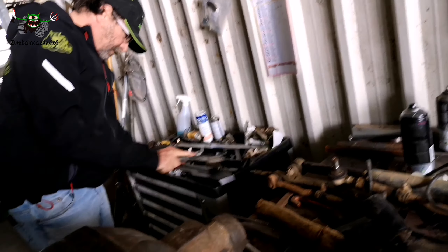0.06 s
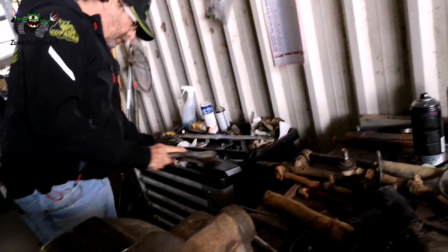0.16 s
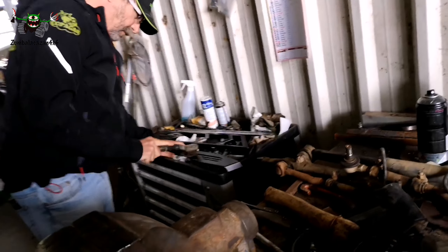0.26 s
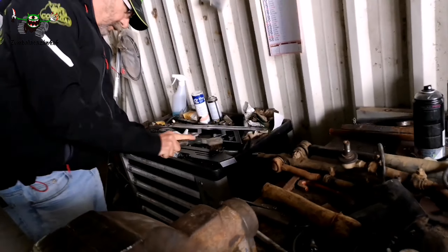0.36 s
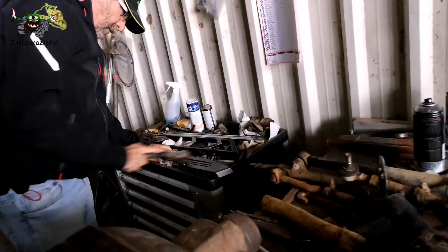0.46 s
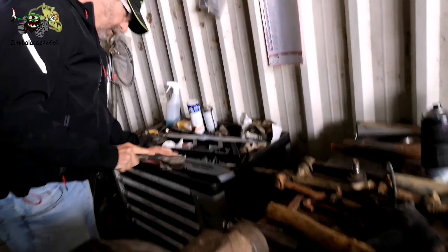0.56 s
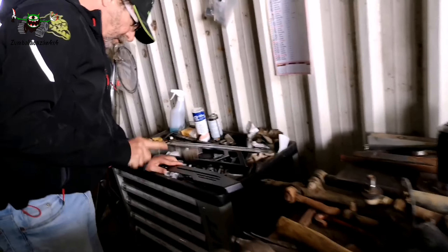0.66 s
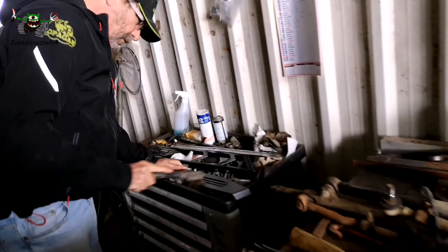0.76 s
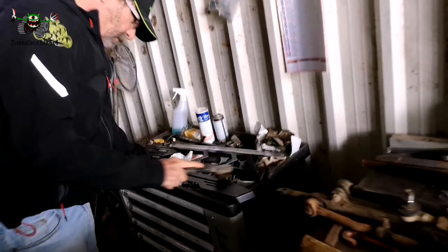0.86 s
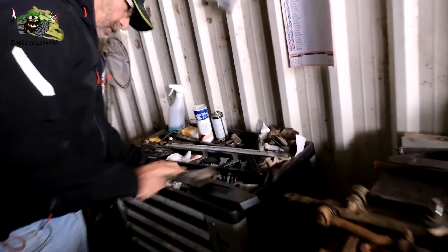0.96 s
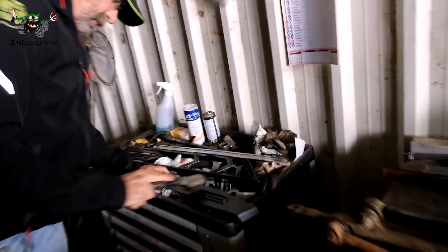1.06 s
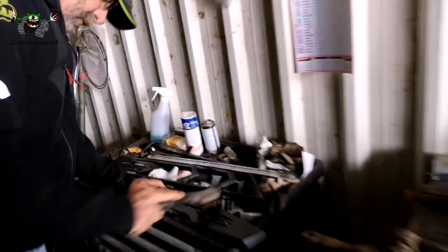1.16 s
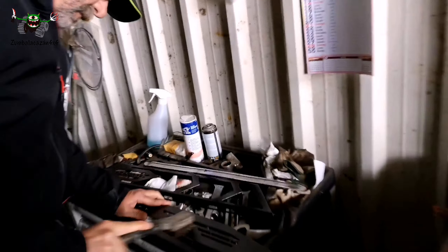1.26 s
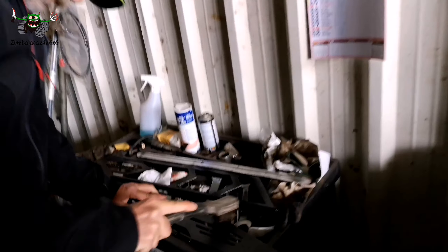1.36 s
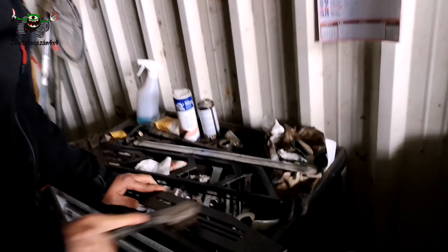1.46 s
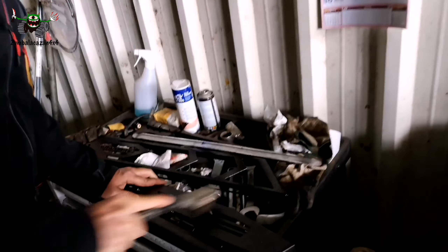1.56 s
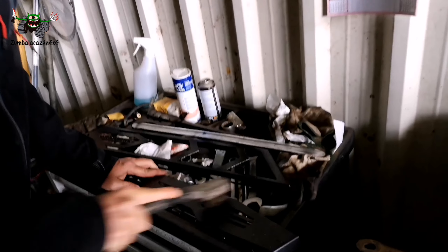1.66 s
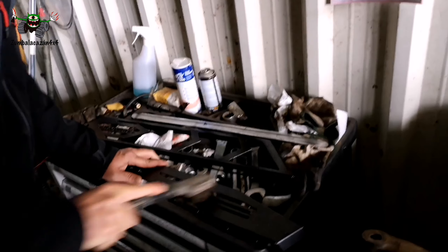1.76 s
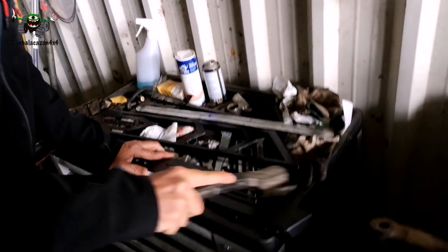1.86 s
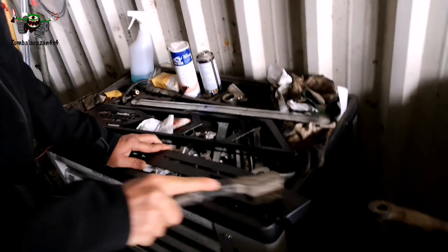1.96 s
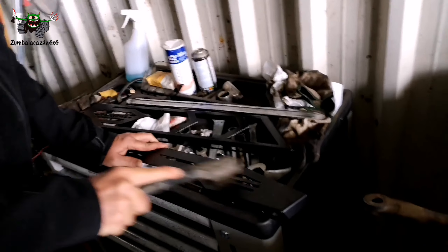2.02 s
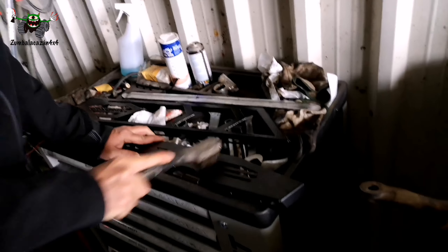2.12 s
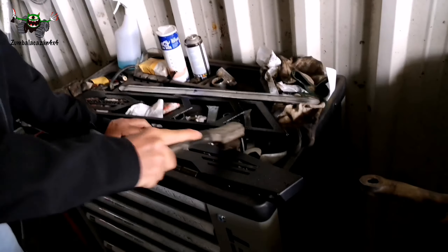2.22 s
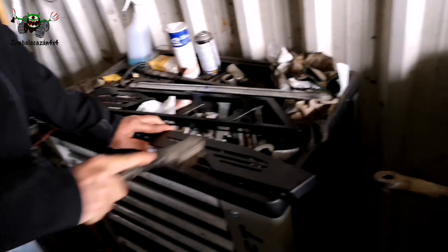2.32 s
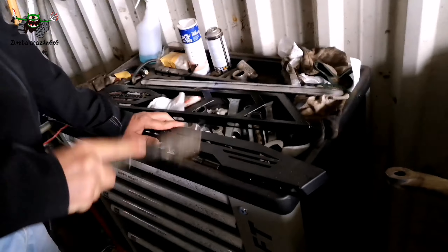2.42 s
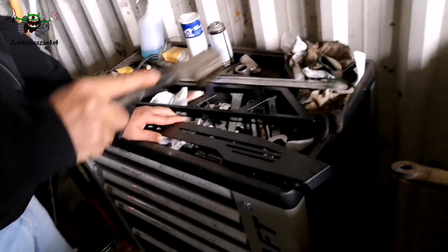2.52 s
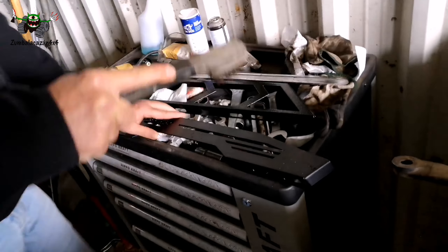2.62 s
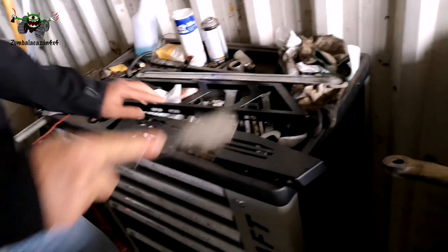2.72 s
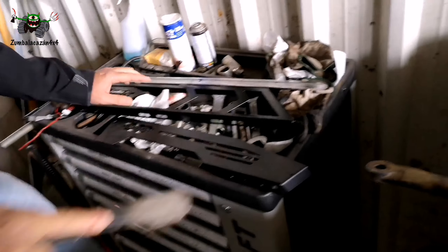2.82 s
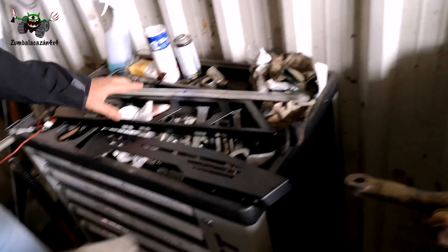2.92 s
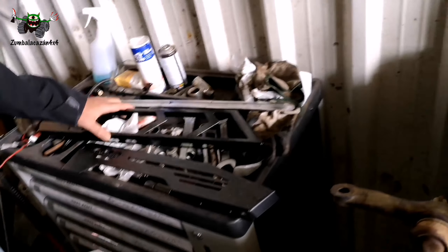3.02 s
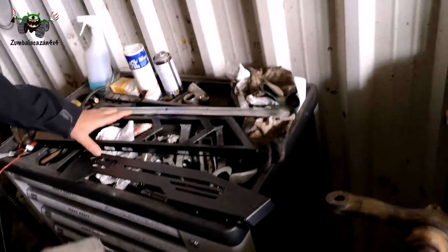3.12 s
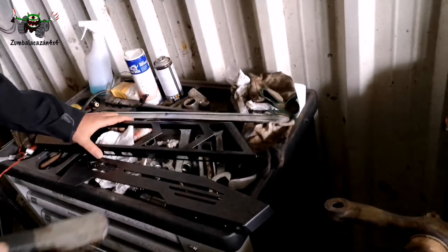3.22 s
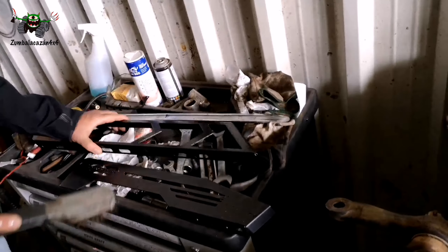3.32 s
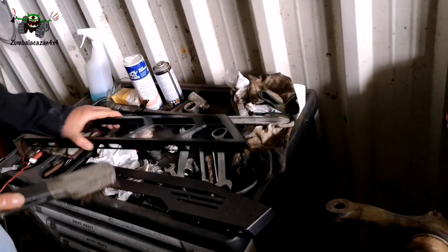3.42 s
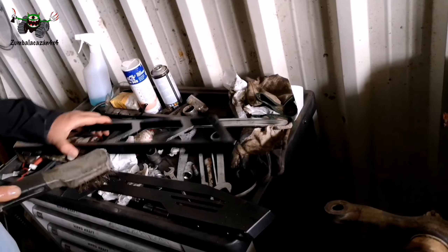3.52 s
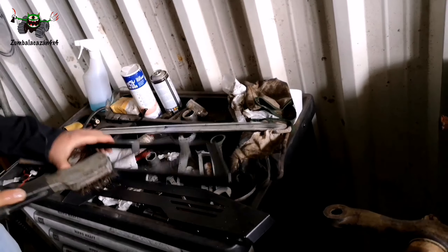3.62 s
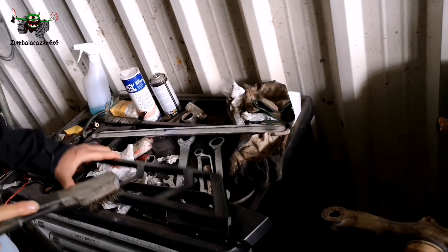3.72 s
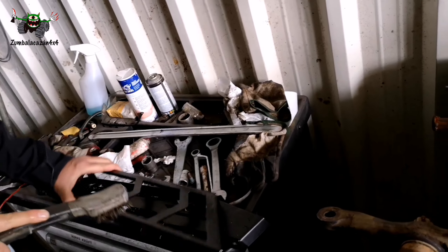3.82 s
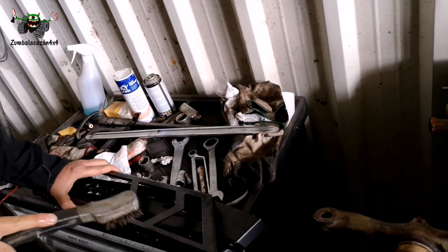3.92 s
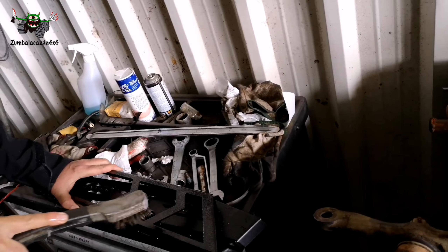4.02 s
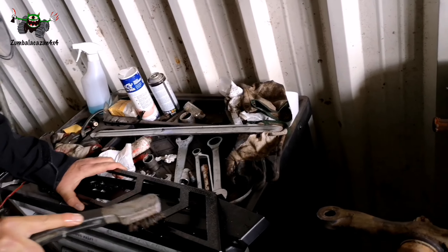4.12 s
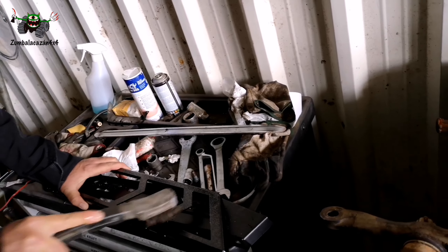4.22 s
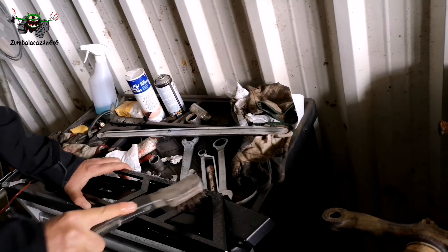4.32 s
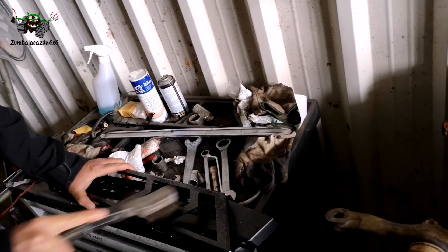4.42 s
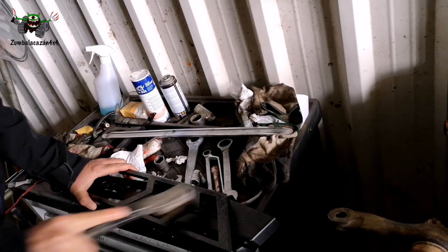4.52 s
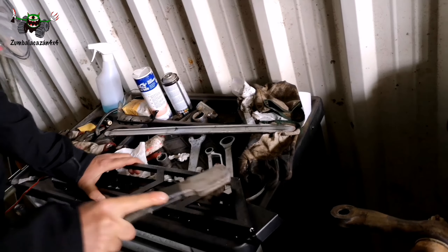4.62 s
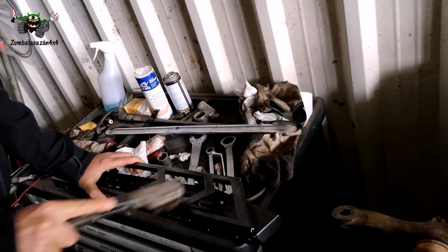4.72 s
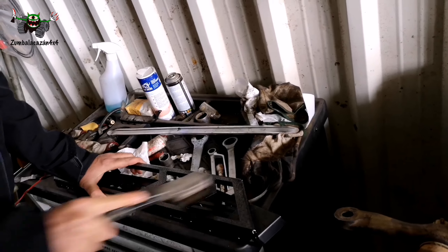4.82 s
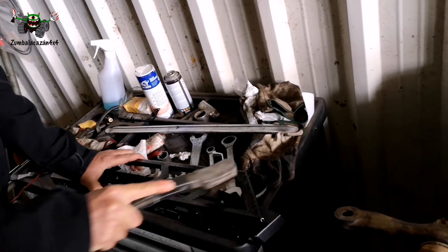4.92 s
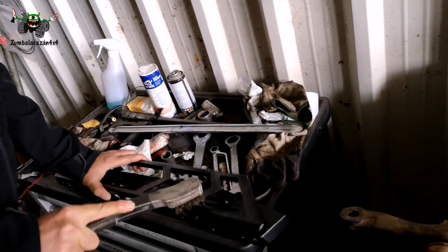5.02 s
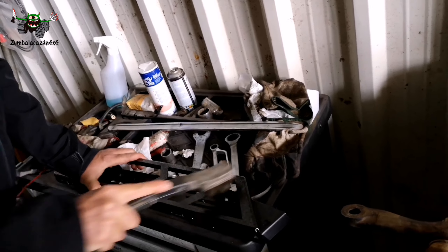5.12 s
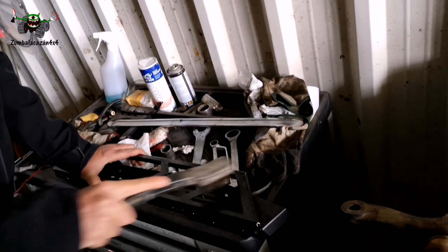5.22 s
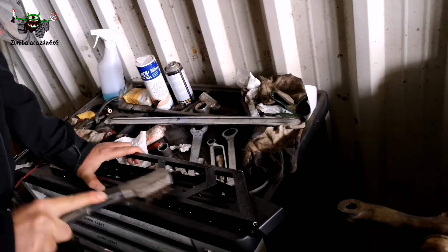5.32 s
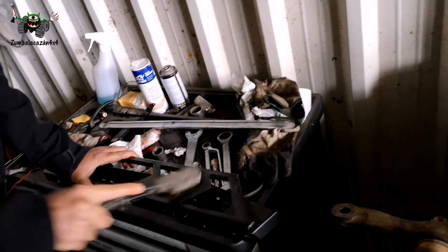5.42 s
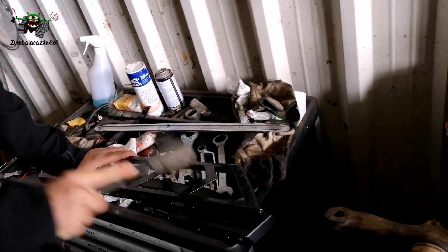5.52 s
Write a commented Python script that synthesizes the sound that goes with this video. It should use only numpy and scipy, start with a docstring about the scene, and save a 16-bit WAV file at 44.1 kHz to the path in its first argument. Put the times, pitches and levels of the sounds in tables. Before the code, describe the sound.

Fast scratchy wire brushing on painted steel over a booming tool chest, a harsh squealing metal scrape, more brushing, and a final hard clank.

```python
"""Wire brush on a steel plate and frame

In a small sheet-metal workshop a hand wire brush scrubs a painted steel plate lying on a tool chest.
The plate is put aside, a steel frame is dragged over the chest with a harsh scrape and brushed in turn.
Filtered stick-slip clicks make the scraping, gliding tones the chirps and squeals, resonant noise the
booming, rocking chest, and decaying noise and tones the blows; the last clank of the frame is the hardest."""
import sys
import numpy as np
from scipy import signal
from scipy.fft import rfft, irfft, next_fast_len
from scipy.io import wavfile
from scipy.ndimage import uniform_filter1d

SR = 44100
rng = np.random.default_rng(int(sys.argv[2]) if len(sys.argv) > 2 else 0)


def persist_wave(psi):
    """Save psi, clipped to +-1, as 16-bit WAV."""
    counts = np.round(np.clip(psi, -1, 1) * 32767).astype(np.int16)
    wavfile.write(sys.argv[1], SR, np.atleast_2d(counts).T)


N = 245619
T = np.arange(N) / SR  # seconds

# All levels in the tables are relative: the mix sets the final ones.
# Brush strokes on the plate. Each row: time of full speed in seconds, length in seconds,
# rasp in dB, answer of the plate in dB, boom of the drawers in dB.
PLATE_STROKES = [(.005, .035, -45, -43.5, -40), (0.083, 0.087, -39.5, -45, -35.5),
                 (0.261, 0.058, -39, -50, -38.5), (0.391, .065, -38.5, -46.5, -39.5),
                 (0.573, 0.051, -34, -35.5, -32), (0.855, 0.065, -51.5, -47.5, -38.5),
                 (0.952, .055, -45, -41, -31), (1.059, 0.049, -37.5, -35, -43),
                 (1.161, 0.048, -33, -34.5, -33), (1.293, 0.062, -36, -35.5, -35),
                 (1.394, 0.044, -32, -33.5, -31.5), (1.532, 0.056, -32, -33.5, -32),
                 (1.651, 0.046, -31, -33.5, -31.5), (1.779, 0.058, -34.5, -35.5, -36.5),
                 (1.874, 0.056, -32, -38.5, -40), (1.962, 0.094, -43.5, -38.5, -36.5),
                 (2.225, 0.071, -35, -37, -31.5), (2.387, 0.075, -40, -34.5, -32),
                 (2.444, 0.037, -29.5, -33.5, -55)]
# Skids of the plate as it is put aside. Each row: start in seconds, rise in seconds, level in dB, t60 in seconds.
SKIDS = [(2.513, 0.017, -28, 0.31), (2.703, 0.0081, -46, .25)]
# The frame dragged over the chest. Each row: time in seconds, level in dB.
DRAG = [(3.52, -32), (3.672, -22.5), (3.698, -26), (3.854, -26.5), (3.89, -16.5), (3.964, -21), (4.03, -25),
        (4.072, -22.5), (4.34, -38.5)]
# The frame striking the chest. Each row: start in seconds, ring in dB, clatter in dB, thump in dB,
# tick in dB, left minus right in dB.
CLANKS = [(3.466, -45, -37, -35.5, -30, 3), (3.885, -47, -19.5, -29.5, -34.5, 13.5),
          (3.947, -58, -38, -27.5, -18.5, 4.5), (5.499, -19.5, -10, -40, -23.5, 3)]
# Spectrum of the dull part of a blow. Each row: frequency in Hz, density in dB per Hz.
THUMP = [(75, -18), (110, 2), (200, 2.5), (310, -5.5), (450, -5), (900, -16.5)]
# Spectrum of the sharp part of a blow. Each row: frequency in Hz, density in dB per Hz.
TICK = [(1500, 4.5), (4000, 3), (6000, 3.5), (9000, -3.5), (15000, -18.5)]


def undb(db):
    """Decibels to gain."""
    return 10 ** (np.asarray(db) / 20)


def unit(x):
    """Scale to rms 1."""
    return x / np.sqrt(np.mean(x ** 2))


def swell(rows):
    """Gain of a level curve in (s, dB), fading quickly outside its span."""
    times, db = np.transpose(rows)
    outside = np.maximum(times[0] - T, 0) + np.maximum(T - times[-1], 0)
    return undb(np.interp(T, times, db)) * np.exp(-outside / .022)


def pan(db):
    """Left and right gains for a level difference, left minus right."""
    return undb(np.array([[db], [-db]]) / 2)


def colour(x, points):
    """Filter by a (Hz, dB) spectrum that falls away beyond its ends; rms 1."""
    hz, db = np.transpose(points)
    size = next_fast_len(x.shape[-1])
    f = np.fft.rfftfreq(size, 1 / SR) + 1e-3  # never zero, for the logarithm
    ends = 1 / np.sqrt((1 + (hz[0] / 2 / f) ** 6) * (1 + (f / hz[-1] / 2) ** 6))
    gain = ends * undb(np.interp(np.log(f), np.log(hz), db))
    return unit(irfft(rfft(x, size) * gain, size)[..., :x.shape[-1]])


def resonate(x, peaks, order=1):
    """Pass through (Hz, width in Hz, dB) resonances; rms 1."""
    size = next_fast_len(N)
    f = np.fft.rfftfreq(size, 1 / SR) + 1e-3
    response = sum(undb(db) / (1 + 1j * (f * f - hz * hz) / (f * width)) ** order
                   for hz, width, db in peaks)
    return unit(irfft(rfft(x, size) * response, size)[..., :N])


def wander(rate):
    """Smooth chance of rms 1 that changes about rate times a second."""
    steps = rng.standard_normal(8192)
    return unit(np.interp(T * rate, np.arange(len(steps)), steps))


def slips(rate, judder_db, count=3):
    """Stick and slip: bunched clicks ring the steel's countless short modes, other ones as the contact moves."""
    struck = rng.random((2, N)) < rate / SR
    clicks = struck * rng.standard_normal((2, N)) * undb(judder_db * wander(450))
    out = np.zeros((2, N))
    for place in range(count):
        ring = rfft(rng.standard_normal((2, 1024)) * np.exp(-T[:1024] / .005))
        ring /= np.sqrt(uniform_filter1d(np.abs(ring) ** 2, 16))  # level the broad spectrum
        nearness = np.maximum(np.cos(2 * np.pi * (2.1 * T + place / count)), 0)
        out += signal.oaconvolve(clicks * nearness, irfft(ring), axes=1)[:, :N]
    return unit(out)


def fade(t60):
    """Envelope that falls 60 dB in t60 seconds (at least 5 ms), one second long."""
    return np.exp(-np.log(1000) * T[:SR] / max(t60, .005))


def burst(points, t60):
    """A blow into many close, short modes; the contact takes a few milliseconds."""
    contact = np.sin(np.pi / 2 * np.minimum(T[:SR] / .003, 1)) ** 2
    return colour(rng.standard_normal((2, SR)), points) * fade(t60) * contact


def add(out, s, sound):
    """Mix a sound in at time s."""
    start = int(s * SR)
    out[:, start:start + sound.shape[-1]] += sound[..., :N - start]


def sing(hz, width):
    """A friction-driven resonance whose pitch may glide: a tone of ever-changing strength and phase."""
    phase = 2 * np.pi * np.cumsum(hz * np.ones(N)) / SR
    return wander(width) * np.cos(phase) + wander(width) * np.sin(phase)


def stroke(s, length):
    """Speed of the brush in one stroke: it peaks at s and stays above half for the given length."""
    rise_share, bluntness = 0.47, 1.26  # share of the length spent speeding up; peak: 1 pointed, 2 round
    away = np.where(T < s, (s - T) / rise_share, (T - s) / (1 - rise_share)) / length
    return .5 ** np.minimum(away ** bluntness, 40)


def jolt(s, rise, t60):
    """Envelope of a sudden push at s: a quick rise, then a steady decay."""
    return np.clip((T - s) / rise, 0, 1) * np.exp(-np.log(1000) * np.maximum(T - s - rise, 0) / t60)


def shop():
    """Quiet workshop air, noise of slowly wandering level, over a low rumble."""
    # Spectrum of the air. Each row: frequency in Hz, density in dB per Hz.
    air_points = [(150, -17), (309, -24), (529, -29), (856, -19.5), (1460, -23.5), (1860, -18),
                  (3350, -25.5), (10600, -35), (15000, -44)]
    # Spectrum of the rumble. Each row: frequency in Hz, density in dB per Hz.
    rumble_points = [(24, -3.5), (32, 6), (55, -2), (90, -7.5), (160, -21)]
    air = colour(rng.standard_normal((2, N)), air_points) * undb(-61 + 2.1 * wander(6.8))
    return air + colour(rng.standard_normal(N), rumble_points) * undb(-53)


def room(x):
    """Close metal walls give a short dense tail, stronger on the right; the highest treble dies first."""
    mids = burst([(300, 2.5), (1000, 0.0), (2600, 3.0), (4000, -4.5), (8000, -39)], t60=0.52)
    treble = burst([(2500, -9.0), (4500, 1.5), (7500, -7.5), (11000, -8)], t60=0.63)
    top = burst([(6000, -14), (10000, 4), (15000, 4)], t60=0.2)
    tail = undb(-45.5) * mids + undb(-47.5) * treble + undb(-61) * top
    tail = tail * np.clip(T[:SR] / 0.012, 0, 1)
    return signal.fftconvolve(x, tail, axes=1)[:, :N] * pan(-6.5)


def shaking(lag, spread):
    """The push of the strokes on the plate as it reaches the chest, late and drawn out (both in s)."""
    return sum(undb(db) * stroke(s + lag, length + spread) for s, length, _, _, db in PLATE_STROKES)


def grinding():
    """Pressure on the frame: it builds up as the brushing starts, then slowly eases."""
    start_s, rise_s, start_db, ease_db_per_s = 4.2, 0.22, -32.5, 4.5
    since = T - start_s
    build_up = np.sin(np.pi / 2 * np.clip(since / rise_s, 0, 1)) ** 2
    return build_up * undb(start_db - ease_db_per_s * since)


def chest():
    """Strokes, skids, blows and grinding boom in the drawers; all but the blows, and the drag, rock the castors."""
    # Resonances of the drawers. Each row: frequency in Hz, width in Hz, level in dB.
    drawer_peaks = [(64.5, 36, -8), (86.2, 23, 2), (107.6, 34.6, -1), (181.5, 31.4, -3), (213.8, 12, -7)]
    # Rocking on the castors. Each row: frequency in Hz, width in Hz, level in dB.
    castor_peaks = [(28.6, 8.3, -4), (40.8, 24, -10)]
    boom = resonate(rng.standard_normal(N), drawer_peaks, order=2)
    boom = boom + undb(-25) * resonate(rng.standard_normal((2, N)), drawer_peaks, order=2)  # some width
    rock = resonate(rng.standard_normal(N), castor_peaks, order=2)
    blows = sum(undb(thump_db) * jolt(s, rise=0.0091, t60=0.93) for s, _, _, thump_db, _, _ in CLANKS)
    shoves = sum(undb(db) * jolt(s, rise, t60=1.24) for s, rise, db, _ in SKIDS)  # settles slowly

    drawers = shaking(lag=0.022, spread=0.029) * undb(-1.3) + blows * undb(-10.0)
    drawers += shoves * undb(-19) + grinding() * undb(-1.0)
    castors = shaking(lag=.05, spread=0.12) * undb(-15.5) + shoves * undb(-18.5)
    castors += swell(DRAG) * undb(-25.5) + grinding() * undb(1.5)
    return boom * drawers + rock * castors


def squeaks():
    """Thin, faint squeaks while the pieces are swapped: wavering friction tones of steady pitch."""
    # Each row: start in seconds, length in seconds, frequency in Hz, level in dB.
    squeak_rows = [(2.856, 0.1, 3900, -71), (3.1, 0.16, 3830, -69), (3.25, .15, 3090, -73)]
    return sum(undb(db) * np.sin(np.pi * np.clip((T - s) / length, 0, 1)) * sing(hz, width=70)
               for s, length, hz, db in squeak_rows)


def knocks():
    """Dull knocks of the brush head and the plate: damped noise, the thump longer and the tick shorter."""
    # Each row: start in seconds, level in dB, thump in dB, tick in dB, t60 in seconds, left minus right in dB.
    knock_rows = [(.530, -45.5, 1, 8, 0.19, -2), (.789, -38.5, -2.5, -4, 0.27, -0.5),
                  (0.928, -40.5, 5, 1, 0.093, 1), (1.004, -39.5, -8, -7, .05, -2),
                  (1.056, -40, -3.5, -15, 0.11, -4), (1.083, -43, -10, -14, 0.029, -2),
                  (1.282, -52, -12, -7, 0.12, 13), (1.519, -35, -6.5, -12, 0.16, 3.5),
                  (1.981, -45, 2.5, -18, 0.065, 0), (2.041, -50.5, 10.5, -18, 0.053, 2),
                  (2.133, -52.5, -9, 11.5, 0.23, 0.5), (2.393, -31, -3.5, 2, 0.04, 5),
                  (3.044, -34, -10.5, -28, 0.033, 2), (5.006, -34.5, -9, -17, 0.19, 2)]
    # Spectrum of the middle of a knock. Each row: frequency in Hz, density in dB per Hz.
    knock_points = [(150, -19), (450, 5.5), (700, -2.5), (1050, 9.5), (1400, -6.5), (2400, -9.5),
                    (4000, -46), (9000, -46)]
    out = np.zeros((2, N))
    for s, db, thump_db, tick_db, t60, pan_db in knock_rows:
        blow = burst(knock_points, t60)
        blow = blow + undb(thump_db) * burst(THUMP, 1.93 * t60)[0]  # the same on both sides
        blow = blow + undb(tick_db) * burst(TICK, 0.46 * t60)
        add(out, s, blow * undb(db + 4.5) * pan(pan_db))
    return out


def skids():
    """The plate skids a little way over the chest: stick and slip under a fading push."""
    # Spectrum of the sliding plate. Each row: frequency in Hz, density in dB per Hz.
    slide_points = [(300, -17), (700, -12.5), (1100, -10), (1500, -2.5), (2600, -1.5), (3500, -12.5),
                    (5000, -14), (7200, -12.5), (10000, -25), (14000, -43)]
    push = sum(undb(db) * jolt(s, rise, t60) for s, rise, db, t60 in SKIDS)
    return colour(slips(rate=5500, judder_db=0.5), slide_points) * push * undb(-1.5) * pan(-0.77)


def scuff_frame():
    """A corner of the frame grazes the chest just before it lands: sparse stick-slip clicks that die away."""
    # Spectrum of the graze. Each row: frequency in Hz, density in dB per Hz.
    scuff_points = [(400, -8), (800, -6), (1050, 7), (1400, -10), (2400, -6), (3500, -18), (9000, -26),
                    (14000, -43)]
    graze = colour(slips(rate=1700, judder_db=1, count=2), scuff_points)
    return graze * undb(-44) * jolt(3.412, rise=0.012, t60=1)


def clanks():
    """The frame hits the chest: a tick, a clatter, a thump and the ring of its bars."""
    # Free ring of the frame. Each row: frequency in Hz, level in dB, t60 in seconds.
    frame_modes = [(914, -1, 0.24), (1066, -15.5, 0.14), (1280, -7, 0.15), (1518, -13, .35),
                   (2080, -19, .15), (2450, -20, 0.18), (2620, -20, 0.31), (3000, -25, 0.062),
                   (3320, -24, .3), (3790, -9, 0.069), (4030, -16, 0.085), (4420, -6, 0.077),
                   (5400, -14, 0.1)]
    # Spectrum of the clatter. Each row: frequency in Hz, density in dB per Hz.
    clatter_points = [(300, -4), (650, -24), (950, 7), (1700, 1), (2400, 9.5), (3500, -0.5), (6000, -37)]
    out = np.zeros((2, N))
    for s, ring_db, clatter_db, thump_db, tick_db, pan_db in CLANKS:
        ring = np.zeros((2, SR))
        for hz, db, t60 in frame_modes:
            # bars of nearly equal length give each mode a close partner
            for split in (1, 1 + rng.uniform(0.0057, 0.025)):
                cycles = hz * split * T[:SR] + rng.random((2, 1))
                ring += undb(db) * fade(t60) * np.sin(2 * np.pi * cycles)
        blow = undb(ring_db + 2.5) * ring + undb(clatter_db) * burst(clatter_points, t60=0.13)
        blow += undb(tick_db + 2) * burst(TICK, t60=0.16)
        thump = undb(thump_db) * burst(THUMP, t60=0.27)[0]  # in the middle
        add(out, s, blow * pan(pan_db) + thump)
    return out


def squeals():
    """The dragged edge catches one resonance after another; stick and slip roughen pitch and strength."""
    # Each row: start in seconds, length in seconds, start frequency in Hz, end frequency in Hz, level in dB.
    squeal_rows = [(3.53, 0.092, 1800, 1500, -34), (3.62, 0.119, 2120, 1990, -24.5),
                   (3.71, 0.139, 1900, 1960, -26.5), (3.69, 0.16, 2850, 2870, -29.5),
                   (3.835, 0.064, 1360, 1230, -25.5), (3.885, 0.0904, 2200, 2600, -25),
                   (4.035, .065, 1300, 1265, -23), (4.11, 0.072, 1100, 1270, -32.5),
                   (4.07, .15, 2200, 2800, -29.5), (5, 0.179, 1880, 1600, -43)]
    out = np.zeros(N)
    for s, length, start_hz, end_hz, db in squeal_rows:
        along = np.clip((T - s) / length, 0, 1)
        hz = (start_hz + (end_hz - start_hz) * along) * (1 + .031 * wander(350))
        tone = np.sin(2 * np.pi * np.cumsum(hz) / SR)
        out += tone * np.sin(np.pi * along) * undb(db + 3.9 * wander(200))
    return out


def drag_frame():
    """The frame judders over the chest: its bars ring and its edge squeals."""
    # Spectrum of the sliding frame. Each row: frequency in Hz, density in dB per Hz.
    slide_points = [(150, -25), (480, -21), (720, -22), (1000, -5), (1400, -4), (2000, -0.5), (2900, -3.5),
                    (3500, -14), (5000, -21), (7300, -15), (8600, -24), (10500, -28.5), (12500, -40),
                    (15000, -68)]
    # Resonances of the frame while a hand holds it. Each row: frequency in Hz, width in Hz, level in dB.
    held_peaks = [(1290, 55, -13), (1824, 62.4, 13), (2165, 22, 15), (2370, 40, -9), (2480, 14, 9),
                  (2610, 35, 0), (2840, 26, 1.5), (3090, 27, -15), (3790, 31, -10), (4200, 18, -11),
                  (5460, 70, 2.5), (5910, 38, 3), (6080, 24, -17)]
    scrape = colour(slips(rate=4600, judder_db=-1.0), slide_points) * undb(-2.5)
    bars = resonate(rng.standard_normal((2, N)), held_peaks, order=2) * undb(-11.5)
    dragged = swell(DRAG) * (scrape + bars) + squeals() * undb(-0.5)
    return dragged * undb(0.29 * wander(82)) * pan(-5.0)


def brush_frame():
    """Lighter strokes along the narrow bars, while the frame grinds on the chest: two streams of stick and slip."""
    # Each row: time of full speed in seconds, length in seconds, rasp in dB.
    frame_strokes = [(4.383, 0.16, -42), (4.564, 0.13, -35.5), (4.672, 0.049, -33.5), (4.78, 0.1, -42.5),
                     (4.977, 0.093, -38), (5.067, 0.093, -41), (5.225, 0.1, -42), (5.327, 0.029, -36.5),
                     (5.383, 0.031, -36.5), (5.478, 0.057, -36.5)]
    # Spectrum of the bristles on the frame. Each row: frequency in Hz, density in dB per Hz.
    rasp_points = [(1500, 0), (3500, 0), (5000, -2), (6300, -2), (8000, 0), (10000, -2), (12000, -7),
                   (15000, -19)]
    # Spectrum of the frame grinding on the chest. Each row: frequency in Hz, density in dB per Hz.
    grind_points = [(200, -11.5), (450, -6), (700, -11), (1000, -8), (1400, 1), (1900, 1), (2700, -4.5),
                    (3500, -13.5), (6000, -18.5), (10000, -38)]
    tips = sum(undb(db) * stroke(s, length) for s, length, db in frame_strokes)
    rasp = colour(slips(rate=9700, judder_db=0.0), rasp_points) * tips * undb(0.8) * pan(0.61)
    grind = colour(slips(rate=9000, judder_db=0.9), grind_points) * grinding() * pan(-4.0)
    return (rasp + grind) * undb(0.85 * wander(70))


def chirps():
    """Bristles fall into step and squeak in several strands, mostly gliding upward as a push gathers speed."""
    # Each row: start in seconds, length in seconds, start frequency in Hz, end frequency in Hz, level in dB.
    chirp_rows = [(.995, 0.05, 2400, 2300, -37.5), (1.225, 0.093, 1892, 3040, -33),
                  (1.47, 0.051, 1900, 2600, -43), (1.715, .075, 1840, 2730, -33),
                  (2.18, .07, 1780, 2300, -39), (2.34, .1, 1800, 2498, -32.5)]
    hz, strength = np.full(N, float(chirp_rows[0][2])), np.zeros(N)
    for s, length, start_hz, end_hz, db in chirp_rows:
        along = np.clip((T - s) / length, 0, 1)
        hz = np.where(T > s, start_hz + (end_hz - start_hz) * along, hz)
        strength += undb(db) * np.sin(np.pi * along)
    rough_hz = hz * (1 + 0.0272 * wander(500))
    lead = np.sin(2 * np.pi * np.cumsum(rough_hz) / SR) * undb(-0.5 + 2 * wander(300))
    strands = np.array([sing(hz * .82, width=100), sing(hz, width=180)])  # one on each side
    return strength * (lead + undb(-4.0) * strands)


def twangs(low_hz, high_hz, count):
    """Tufts of wire ring as they spring free: flickering tones, each at its own wavering pitch."""
    out = np.zeros((2, N))
    for k, hz in enumerate(np.geomspace(low_hz, high_hz, count)):
        flicker = undb(4.2 * np.clip(wander(28.2), -1.5, 1.5))
        out[k % 2] += sing(hz * (1 + 0.034 * wander(15)), width=170) * flicker  # sides in turn
    return unit(out)


def brush_plate():
    """Wire tips flick over the paint in quick strokes; plate and tufts answer in the mids, a little longer."""
    # Spectrum of the bristle tips. Each row: frequency in Hz, density in dB per Hz.
    rasp_points = [(300, -1.5), (700, -10.5), (1200, -5), (2500, -5), (3500, 0), (5000, -2), (8000, -1),
                   (10000, -2), (12500, -8), (15000, -17.5)]
    # Spectrum of the plate's answer. Each row: frequency in Hz, density in dB per Hz.
    plate_points = [(280, -27), (460, -0.5), (700, -4.5), (1050, 7.5), (1400, -0.5), (2200, 9.5),
                    (2800, 7.5), (3500, -1.5), (6000, -45)]
    tips = sum(undb(db) * stroke(s, length) for s, length, db, _, _ in PLATE_STROKES)
    answer = sum(undb(db) * stroke(s, length * 1.123) for s, length, _, db, _ in PLATE_STROKES)
    rasp = colour(slips(rate=14000, judder_db=-0.5), rasp_points) * undb(2.5) * pan(1.1)
    plate = colour(slips(rate=5000, judder_db=3.5), plate_points) * undb(-1.0)
    plate += twangs(low_hz=1739, high_hz=2957, count=8) * undb(-7.5)
    return (tips * rasp + answer * plate * pan(0.95)) * undb(1.65 * wander(110))


def scene():
    """The steel, close and with the room's tail, over the chest and the workshop air."""
    steel = squeaks() + knocks() + skids() + scuff_frame() + clanks()
    steel = steel + drag_frame() + brush_frame() + chirps() + brush_plate()
    return undb(0.28) * steel + room(steel) + chest() + shop()


def record(dry):
    """Each microphone port colours its side; the recorder rounds the highest peaks and cuts the top."""
    # The two ports differ. Each row: frequency in Hz, left minus right in dB.
    port_points = [(200, 0), (650, 5.5), (1300, 0.5), (2400, -2), (4400, 2), (8000, 2), (14000, -7)]
    hz, db = np.transpose(port_points)
    tilt = np.interp(np.log(np.fft.rfftfreq(N, 1 / SR) + 1), np.log(hz), db)
    heard = irfft(rfft(dry) * undb(np.array([tilt, -tilt]) / 2), N)
    top_hz = 15350
    top_cut = signal.ellip(10, .2, 80, top_hz, fs=SR, output="sos")
    return signal.sosfilt(top_cut, np.tanh(heard))


dry = scene()
out = record(dry)
persist_wave(out)
```